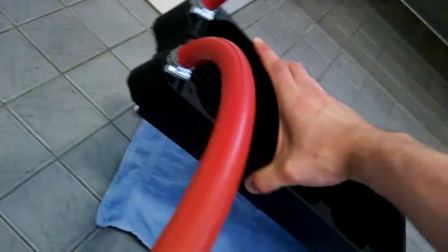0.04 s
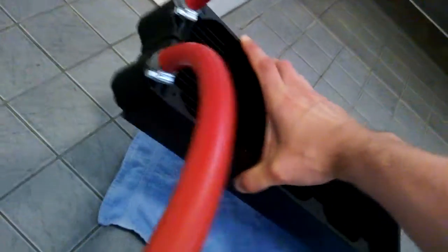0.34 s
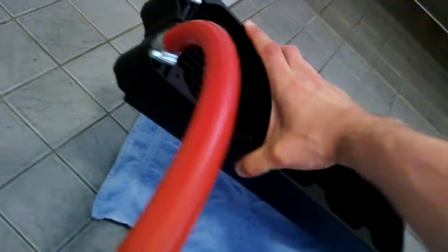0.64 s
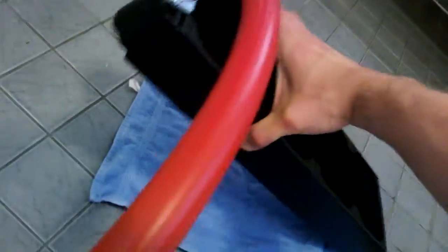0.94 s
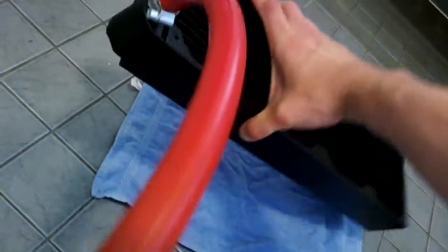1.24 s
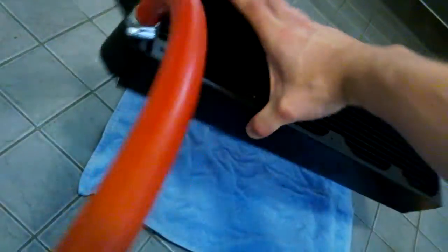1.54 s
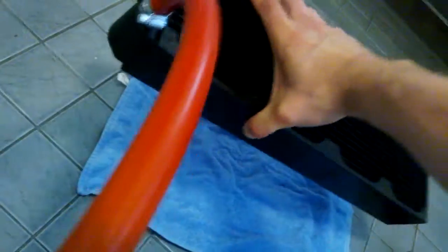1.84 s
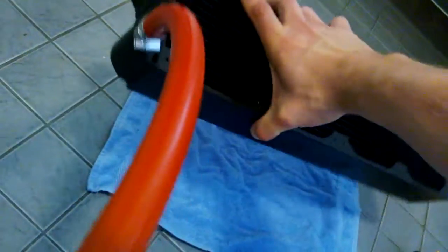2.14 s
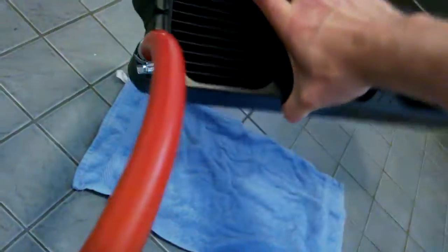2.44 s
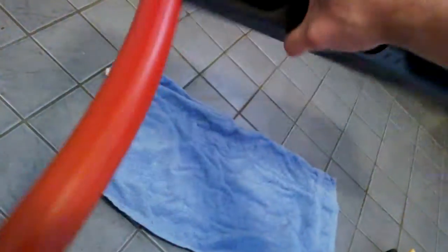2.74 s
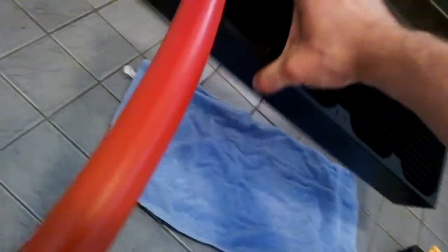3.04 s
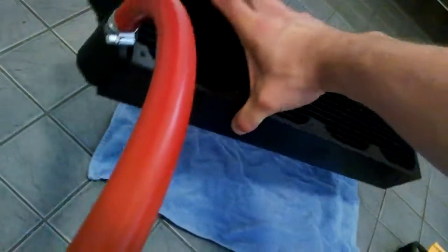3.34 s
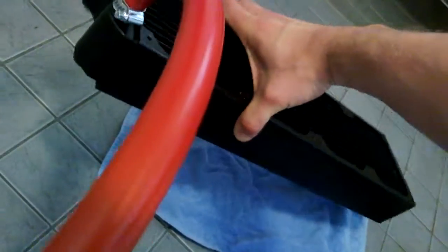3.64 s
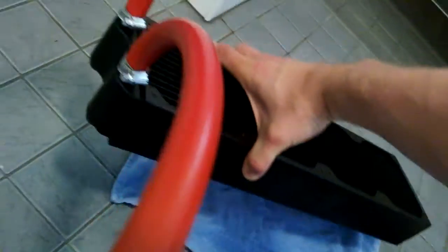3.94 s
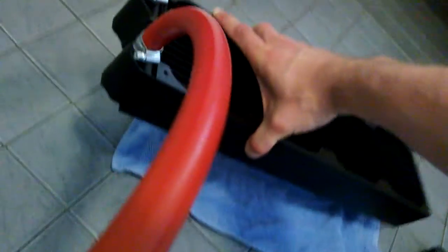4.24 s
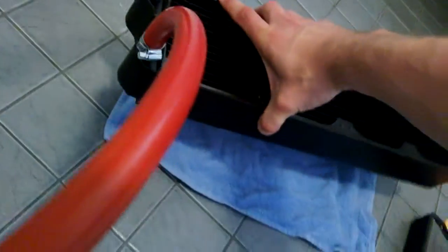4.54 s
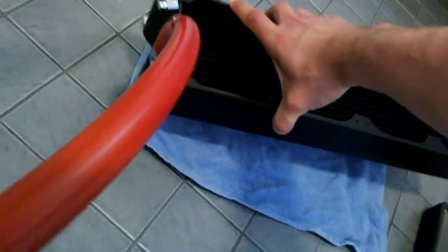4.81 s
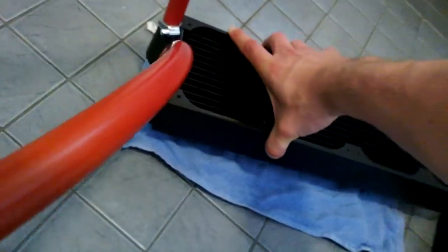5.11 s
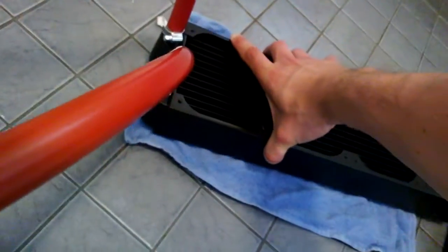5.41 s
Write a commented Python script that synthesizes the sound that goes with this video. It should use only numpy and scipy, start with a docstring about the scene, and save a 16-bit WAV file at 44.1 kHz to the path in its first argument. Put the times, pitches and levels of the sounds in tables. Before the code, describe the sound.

A small underwater pump hums steadily while water churns and throbs in deep, uneven surges through rubber hoses, with a faint gurgle and hiss. A hand tilts a radiator, giving one hollow knock near the start and lighter knocks in the middle and later on. Tiny air pockets pop with squishy ticks, and there are two soft bumps. It sounds close and quiet, with a short echo from the tiled room.

```python
"""In a tiled room, a small underwater pump hums as it pushes water through rubber hoses and a radiator.
The water hisses, gurgles and churns, and its surges make a deep throb in the hoses.
A hand tilts the radiator: it knocks, rings and bumps softly, while tiny air pockets pop
in the wet hoses and fittings with squishy ticks. The tiles echo the knocks and ticks."""
import sys
import numpy as np
from scipy import signal
from scipy.fft import rfft, irfft, next_fast_len
from scipy.io import wavfile
from scipy.ndimage import map_coordinates

SR = 44100
rng = np.random.default_rng(int(sys.argv[2]) if len(sys.argv) > 2 else 0)


def dump_mix(stems):
    """Bounce the given channels to the path in sys.argv[1] as a 16-bit WAV at rate SR."""
    frames = np.atleast_2d(stems).T  # one column per channel
    limited = np.clip(frames, -1, 1)  # hard clip at full scale
    pcm = np.round(limited * 32767).astype(np.int16)
    wavfile.write(sys.argv[1], SR, pcm)


N = 245625


def amp(db):
    """Turn decibels into a gain."""
    return 10 ** (np.asarray(db) / 20)


def unit(x):
    """Scale x to an average (rms) level of 1."""
    return x / np.sqrt(np.mean(x ** 2) + 1e-20)


def along(points, hz):
    """Read between (Hz, value) points on a log frequency axis."""
    f, values = np.transpose(points)
    return np.interp(np.log(hz + 1), np.log(f + 1), values)


def wobble(rate):
    """A smooth curve through `rate` random points a second."""
    return unit(map_coordinates(rng.standard_normal(N // 100), [np.arange(N) * rate / SR]))


def filtered(x, response):
    """Scale each frequency f in x by response(f)."""
    size = next_fast_len(len(x) + SR // 4)
    return irfft(rfft(x, size) * response(np.fft.rfftfreq(size, 1 / SR)), size)[:len(x)]


def noise(response, size=N):
    """Filtered noise at level 1."""
    return unit(filtered(rng.standard_normal(size), response))


def resonances(modes, f):
    """How strongly a body answers at f, given its ringing notes as (f/Hz, width/Hz, level/dB)."""
    return sum((-1) ** k * amp(db) * 1j * f * width / (hz * hz - f * f + 1j * f * width)
               for k, (hz, width, db) in enumerate(modes))


def tone(hz):
    """A sine wave at level 1 that follows a pitch curve."""
    return np.sqrt(2) * np.sin(2 * np.pi * (np.cumsum(hz) / SR + rng.random()))


def add(track, start, sound):
    """Mix a sound into the track at `start` seconds."""
    part = track[round(start * SR):][:len(sound)]
    part += sound[:len(part)]


# How long the echo lasts: f/Hz, time to fade by 60 dB/s
ECHO_FADE = [(150, 0.23), (1000, 0.31), (4000, 0.25), (12000, 0.22)]
def room(x, delay_s=0.0046):
    """The tiles throw back a short, bright echo."""
    hz, t, spectrum = signal.stft(rng.standard_normal(SR // 2), SR, nperseg=256)
    fade = amp(-60 * t / along(ECHO_FADE, hz)[:, None])
    tail = signal.istft(spectrum * fade, SR)[1]
    tail = np.pad(tail, (round(delay_s * SR), 0))
    return signal.fftconvolve(x, tail / np.linalg.norm(tail))[:N]


# Tone colour of the hiss: f/Hz, relative level/dB
HISS_COLOUR = [(880, -54), (1500, -3), (1650, 0), (2090, -5), (4170, -3), (4640, -2), (6050, -4),
               (10600, -18), (15100, -21.5), (15700, -18)]
def hiss(level_db=-68.5):
    """Running water makes a faint, smooth hiss."""
    return amp(level_db + 0.68 * wobble(14)) * noise(lambda f: amp(along(HISS_COLOUR, f)))


# How the gurgle rises and falls: t/s, relative level/dB
GURGLE_LEVELS = [(0.0, -66), (0.28, -66), (1.26, -60), (1.47, -58.5), (1.88, -64.5), (2.28, -60.5),
                 (3.01, -66.5), (3.74, -65), (4.81, -65), (4.99, -63), (5.27, -66.5), (5.57, -64)]
# Notes of the hollow hose: f/Hz, width/Hz, relative level/dB
HOSE_NOTES = [(777, 50, -3), (863.6, 19, 2), (942, 29, -2.5), (1024, 40, -0.5), (1156, 69, -8.5)]
def gurgle(gain_db=-1.4, swing_db=1.9):
    """Water gurgles and makes the hollow of the hose ring."""
    level_db = np.interp(np.arange(N) / SR, *np.transpose(GURGLE_LEVELS))
    hose = noise(lambda f: resonances(HOSE_NOTES, f) * resonances([(985, 1100, 0)], f))
    return amp(level_db + gain_db + swing_db * wobble(14)) * hose


# Tone colour of churning water: f/Hz, relative level/dB
CHURN_COLOUR = [(12, -33), (24, -19.5), (34, -7.5), (55, -6), (100, -1.5), (120, -18), (180, -10.5),
                (250, -17.5), (290, -24.5), (430, -24), (560, -29.5), (680, -29.5), (1100, -36.5),
                (1400, -41), (2500, -54), (4000, -93)]
# Notes of the pump and its basin: f/Hz, width/Hz, relative level/dB
BASIN_NOTES = [(51.1, 11.7, 1), (163.6, 25.4, -7.5), (204.4, 31.2, -11.5), (374.3, 51, -17.5),
               (515, 44, -16.5), (1565, 35, -32)]
def churn(surge, stir=0.09, water_db=-47, basin_db=-50.5):
    """Churning water rings the basin; every surge stirs it a little more."""
    surge_db = 20 * np.log10(surge)
    swell_db = stir * (surge_db - surge_db.mean())
    water = amp(water_db) * noise(lambda f: amp(along(CHURN_COLOUR, f)))
    basin = amp(basin_db) * noise(lambda f: resonances(BASIN_NOTES, f))
    return amp(swell_db + 0.94 * wobble(7)) * (water + basin)


# The pump's steady tones: f/Hz, level/dB, pitch waver/Hz
PUMP_TONES = [(35.66, -51.5, 2.52), (53.3, -52, 3.03), (213.4, -59, 0.66), (304, -71, 0.77),
              (367.3, -75, 2.26), (409, -63.5, 0.17), (426.4, -56, 0.22), (509.6, -71, 2.1),
              (855, -73.5, 0.86), (1028, -74, 1.97), (1584, -84, 1.9)]
def pump():
    """The motor and its spinning blades hum, each tone wavering with the load."""
    return sum(amp(db + 0.86 * wobble(7.2)) * tone(hz + waver * wobble(14))
               for hz, db, waver in PUMP_TONES)


# Wet ticks: t/s, relative level/dB, first pitch f/Hz, second pitch f/Hz, time to fade by 60 dB/s
WET_TICKS = [(.095, -60.5, 5070, 5500, 0.11), (.252, -52, 1990, 1720, 0.071),
             (.365, -42.5, 2654, 2450, 0.055), (0.365, -52, 1654, 2130, 0.068),
             (.609, -41, 2134, 2296, 0.067), (.616, -52, 4000, 4140, .075),
             (.651, -71, 11900, 11100, 0.035), (.906, -42.5, 2013, 1710, 0.031),
             (.912, -48.5, 3260, 3520, 0.057), (1.652, -54.5, 1575, 3000, 0.11),
             (2.111, -38.5, 1050, 1100, 0.028), (3.167, -59.5, 6950, 6690, 0.04),
             (3.38, -69, 8300, 7700, .1), (4.3, -48.5, 1635, 2090, .11), (4.318, -55, 3550, 2050, 0.043),
             (4.360, -49.5, 2480, 2600, .04), (4.381, -55, 5270, 5800, 0.035),
             (4.386, -51, 2570, 3220, 0.056), (4.682, -43, 3110, 2070, 0.032),
             (4.684, -46, 4400, 4000, .033)]
def squishes(second_db=-5, spray_db=-6, spray_width=0.61, attack_s=0.00041):
    """A small air pocket pops: two unsteady pitches and a puff of spray."""
    out, t = np.zeros(N), np.arange(SR // 3) / SR
    drift = lambda: 1 + .038 * noise(lambda f: f < 300, len(t))
    for start, db, hz, second_hz, fade_s in WET_TICKS:
        pocket = tone(hz * drift()) + amp(second_db) * tone(second_hz * drift())
        spray = noise(lambda f: resonances([(hz, spray_width * hz, 0)], f) ** 2, len(t))
        loudness = amp(db - 3 - 60 * t / fade_s) * (1 - np.exp(-t / attack_s))
        add(out, start, loudness * (pocket + amp(spray_db) * spray))
    return out


# Soft bumps of the hand: t/s, peak level/dB
HAND_BUMPS = [(1.798, -34), (2.959, -36)]
def bumps(push_s=.0006):
    """A soft touch gives one low push and rebound, with no ring."""
    t = np.arange(N) / SR
    push = lambda u: (1 - u ** 2) * np.exp(-u ** 2 / 2)
    return sum(amp(db) * push((t - peak_s) / push_s) for peak_s, db in HAND_BUMPS)


# Notes of the radiator's tank: f/Hz, width/Hz, relative level/dB
TANK_NOTES = [(245, 17, 8.5), (368, 50, 5), (480, 53, -2.5), (827, 27, -2), (1117, 22, -2.5),
              (1227, 70, -11), (1610, 16, 0.5), (2037, 28, -10), (2220, 24, -22), (2356, 29, -13),
              (2550, 28, -11), (3100, 28, -13), (3460, 45, -20)]
# Tone colour of the rattling fins: f/Hz, relative level/dB
RATTLE_COLOUR = [(100, -27), (200, -2.5), (260, 13.5), (380, -0.5), (500, 1), (650, -7), (1200, -11.5),
                 (1800, -11.5), (3500, -16), (7000, -28), (15000, -49.5)]
# Blows on the radiator: t/s, level/dB, low edge f/Hz, high edge f/Hz, time to fade by 60 dB/s
BLOWS = [(.461, -32.5, 210, 13900, 0.25), (1.652, -50, 800, 3500, 0.069), (1.961, -61.5, 1200, 5000, 0.24),
         (1.988, -50, 1390, 2470, 0.12), (2.196, -39, 755, 4600, 0.1), (2.199, -57, 8000, 16000, 0.12),
         (2.290, -61, 1300, 2600, .15), (4.296, -47.5, 900, 3520, 0.17), (4.340, -52.5, 800, 1800, 0.24),
         (4.378, -50, 1000, 5000, 0.11)]
def knocks(ring_db=-1, attack_s=0.0014):
    """Each blow rattles the radiator's fins and rings its tank; light ones have no bass."""
    out, t = np.zeros(N), np.arange(SR // 2) / SR
    for start, db, low_hz, high_hz, fade_s in BLOWS:
        rattle = noise(lambda f: amp(along(RATTLE_COLOUR, f)), len(t))
        ring = noise(lambda f: resonances(TANK_NOTES, f), len(t))
        band = lambda f: 1 / np.sqrt((1 + (low_hz / (f + 1)) ** 6) * (1 + (f / high_hz) ** 6))
        blow = unit(filtered(rattle + amp(ring_db) * ring, band))
        loudness = amp(db - 60 * t / fade_s) * (1 - np.exp(-t / attack_s))
        add(out, start, loudness * blow)
    return out


# Surges in the hoses: peak t/s, level/dB, length at half height/s
WATER_SURGES = [(0.024, -36.5, 0.058), (.181, -36, 0.056), (.302, -36, .04), (.591, -38.5, 0.063),
                (1.02, -36.5, .055), (1.149, -31.5, 0.089), (1.616, -38.5, 0.029), (1.717, -35, 0.054),
                (1.795, -37.5, 0.068), (1.907, -35, 0.054), (2.211, -34, 0.039), (2.498, -34.5, 0.056),
                (2.624, -31, 0.069), (2.846, -36, 0.04), (2.961, -34, 0.051), (3.175, -32.5, 0.072),
                (3.5, -33.5, 0.082), (3.63, -33, 0.072), (3.718, -35, 0.038), (4.48, -40, .12),
                (5.07, -41.5, 0.22), (5.274, -31.7, 0.078)]
def surging(rest_db=-46.5, swing_db=4):
    """The strength of the throb: surges swell and fall above a low, restless level."""
    t = np.arange(N) / SR
    swells = sum(amp(db) * .5 ** ((2 * (t - peak_s) / length) ** 2)
                 for peak_s, db, length in WATER_SURGES)
    return np.hypot(swells, amp(rest_db + swing_db * wobble(22)))


def throb(surge, pitch_hz=84, wander_hz=4, swirl_db=-15, rumble_db=-21):
    """The water in the hoses booms with each surge: one unsteady low pitch in a wider rumble."""
    boom = tone(pitch_hz + wander_hz * wobble(15))
    swirl = noise(lambda f: resonances([(pitch_hz, 30, 0)], f) ** 2)
    rumble = noise(lambda f: resonances([(157, 123, 0)], f) ** 2)
    return surge * unit(boom + amp(swirl_db) * swirl + amp(rumble_db) * rumble)


def scene():
    """Mix pump, water and handling; the bumps are close by and get no echo."""
    blows, ticks, surge = knocks(), squishes(), surging()
    echo = room(amp(-5.5) * blows + amp(-2.5) * ticks)
    running = pump() + throb(surge) + churn(surge) + gurgle() + hiss()
    return (running + blows + ticks + bumps() + echo)[None]


def record(dry, top_hz=15750):
    """Cut away the very highest treble."""
    return np.array([filtered(channel, lambda f: f < top_hz) for channel in dry])


dry = scene()
out = record(dry)
dump_mix(out)
```